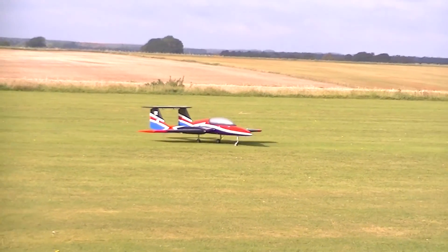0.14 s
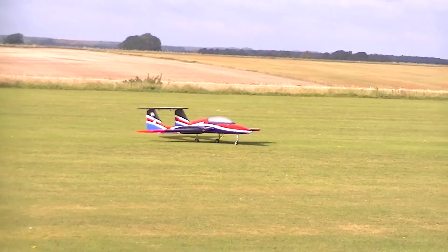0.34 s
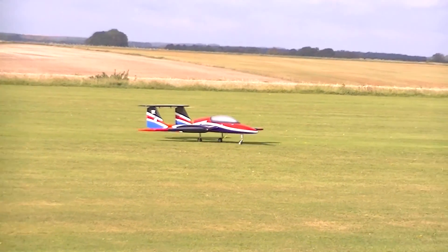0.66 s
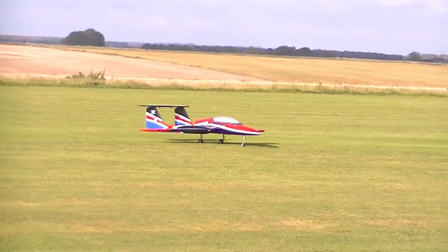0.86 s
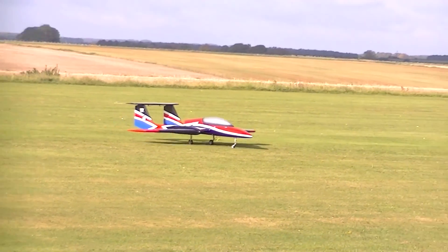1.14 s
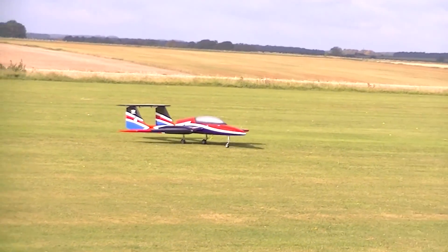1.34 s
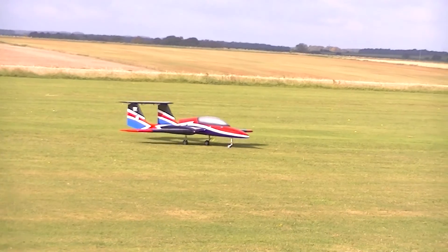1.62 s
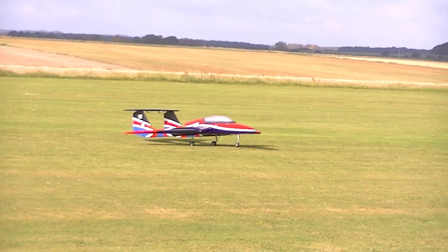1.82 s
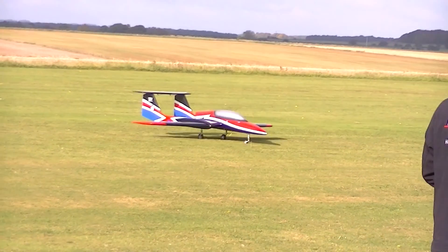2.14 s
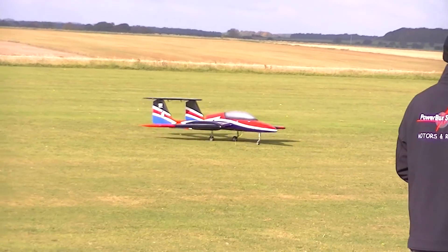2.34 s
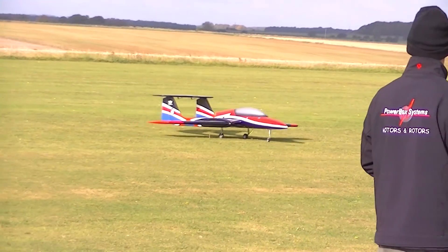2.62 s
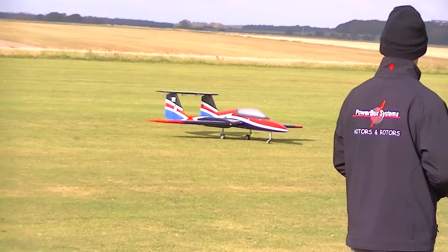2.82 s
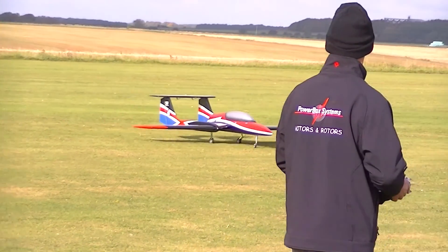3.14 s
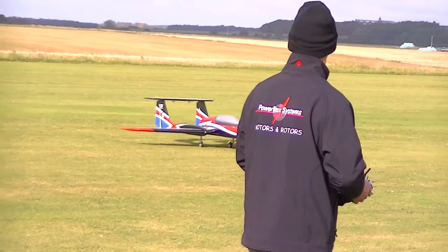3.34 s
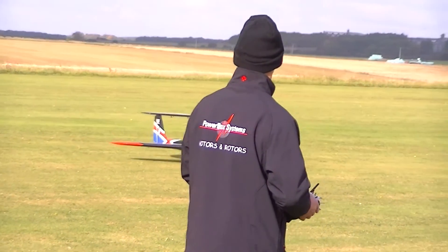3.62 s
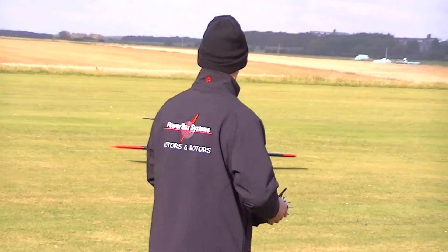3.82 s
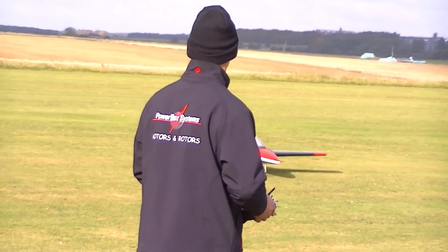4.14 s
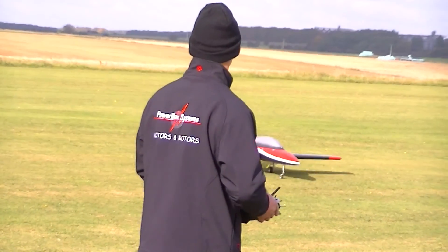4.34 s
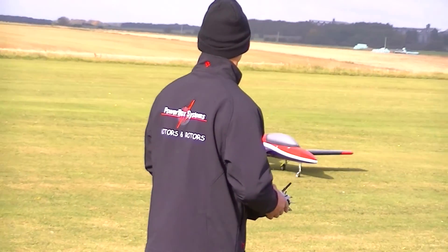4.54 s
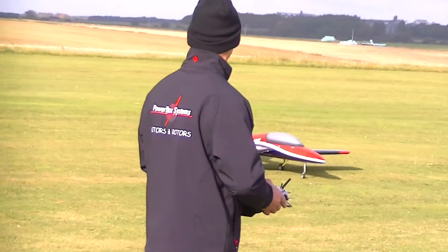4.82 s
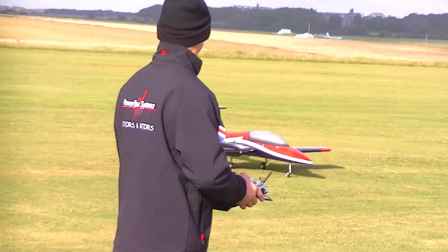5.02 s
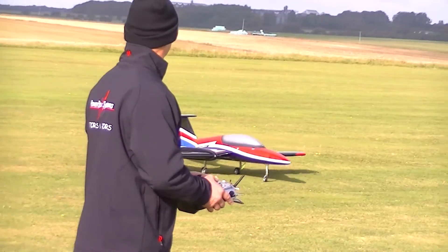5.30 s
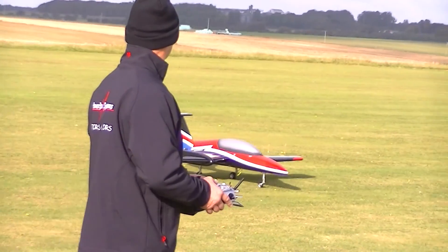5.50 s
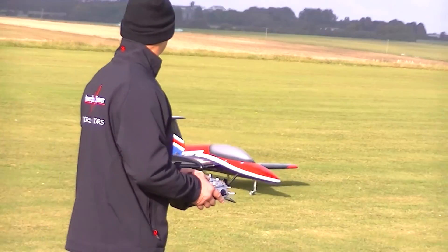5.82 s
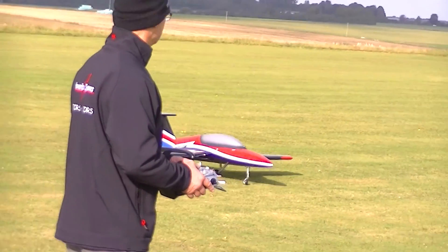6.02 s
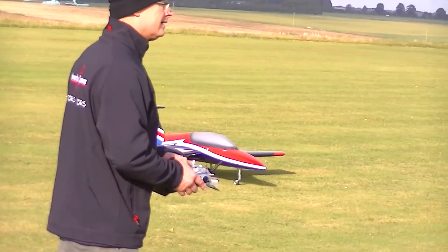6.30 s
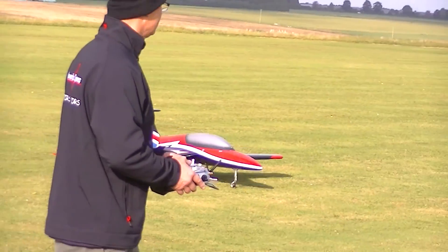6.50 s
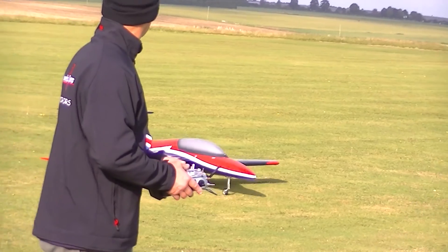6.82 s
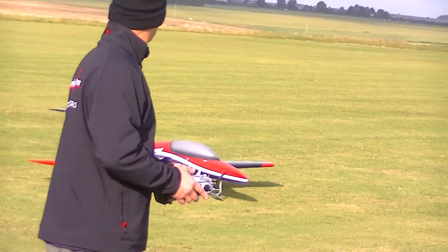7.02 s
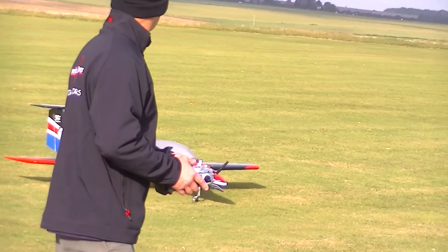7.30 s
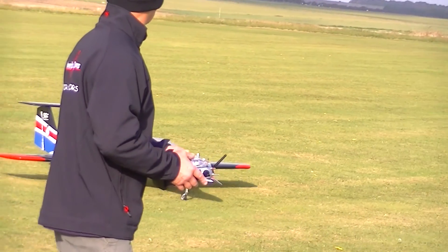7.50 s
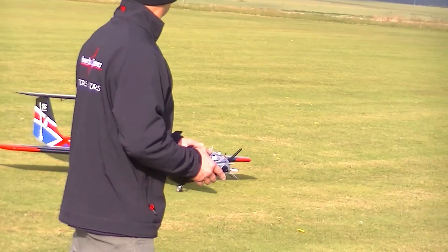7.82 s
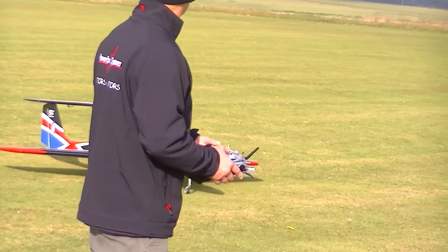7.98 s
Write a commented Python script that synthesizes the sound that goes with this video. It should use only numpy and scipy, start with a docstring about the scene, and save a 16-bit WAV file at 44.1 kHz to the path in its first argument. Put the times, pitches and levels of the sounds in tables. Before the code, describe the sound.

A small turbine rushes and hisses outdoors, heard fairly close and centred, with no echo. Brief low wind thumps come first while the whine drops quickly, then holds. It rises a little midway and falls again, slowing strongly. Near the end the intake faces the microphone: the shrill whine becomes strong and pure, dips to its lowest pitch, then climbs as the rush and roar swell.

```python
"""A model jet taxis over a grass field towards the microphone, side-on at first, its turbine spooling down.
Shaft-locked compressor tones sound over the roar and hiss of the jet, shaped noise; flaps of wind, low noise
in short swells, stir the microphone, most of them in the first second. The turbine slows, picks up a little,
then sinks towards idle; a strong gust comes near 6.2 s and the nose swings round: the whine at 16 times the
shaft rate comes forward, the air takes on a frontal colour. At the end the turbine spools up, the roar grows."""
import sys
import numpy as np
from scipy.fft import rfft, irfft, next_fast_len
from scipy.io import wavfile
from scipy.ndimage import map_coordinates

SR = 44100
rng = np.random.default_rng(int(sys.argv[2]) if len(sys.argv) > 2 else 0)


def store_pcm(level_fs):
    """Save levels as 16-bit WAV."""
    pcm = np.round(np.clip(level_fs, -1, 1) * 32767).astype(np.int16)
    wavfile.write(sys.argv[1], SR, np.atleast_2d(pcm).T)


N = 359415  # length [samples]

# air rushing through the ducts: (time [s], level [dB])
DUCT_RUSH = [(0, -35), (.25, -38.5), (1.3, -40), (2.07, -35.5), (2.3, -39.5), (2.94, -31.5), (3.3, -38),
             (3.78, -33.5), (3.98, -37), (4.41, -33.6), (4.79, -40.5), (5.0, -36), (6.2, -39.5),
             (6.65, -41.5), (7.11, -38.5), (7.44, -33.5), (7.9, -30.7)]
# hiss of the nozzle, swelling and fading on the breeze: (time [s], level [dB])
NOZZLE_HISS = [(0, -34.5), (.68, -33.5), (.87, -37.5), (1.55, -32.5), (1.67, -37.5), (1.78, -28.5),
               (2.3, -35.5), (2.45, -31), (2.82, -36), (2.93, -28), (3.15, -37.5), (3.78, -35.5),
               (3.93, -41.5), (4.58, -39.5), (4.84, -42), (4.98, -33.5), (5.24, -42.5), (5.55, -33.5),
               (5.72, -39.5), (6.4, -41.5), (6.9, -41.5), (7.25, -35.5), (7.68, -37.5), (8.15, -34.5)]
# how much the plane shows its nose and intakes to the microphone: (time [s], share [0-1])
NOSE_SHARE = [(0, 0.02), (3, 0.04), (4.2, 0.17), (5.2, 0.23), (6, 0.25), (6.6, 0.55), (7.3, 0.75),
              (8.15, 0.8)]


def amp(db):
    """Decibels to gain."""
    return 10 ** (np.asarray(db) / 20)


def unit(x):
    """Scale to rms 1."""
    return x / np.sqrt(np.mean(x ** 2) + 1e-20)


def curves(rows):
    """One value per sample for each column after the time."""
    s, *columns = np.transpose(rows)
    return [np.interp(np.arange(N) / SR, s, column) for column in columns]


def glide(rows):
    """A natural cubic spline through (s, value) rows: a heavy rotor changes speed smoothly."""
    s, value = np.transpose(rows)

    def basis(t):
        return np.c_[np.abs(t[:, None] - s) ** 3, np.ones(len(t)), t]

    straight_ends = np.c_[np.array([np.ones(len(s)), s]), np.zeros((2, 2))]
    weights = np.linalg.solve(np.r_[basis(s), straight_ends], np.r_[value, 0, 0])
    t = np.linspace(0, N / SR, 2000)
    return curves(np.c_[t, basis(t) @ weights])[0]


def wobble(rate):
    """A smooth random curve, rate knots a second."""
    knots = rng.standard_normal(int(N * rate / SR) + 4)
    return map_coordinates(knots, [np.arange(N) * rate / SR])


def swell(s, length):
    """A bell-shaped rise and fall around a moment; length [s] runs from the peak to 1/e."""
    return np.exp(-((np.arange(N) / SR - s) / length) ** 2)


def filtered(x, response):
    """x shaped by a gain that depends on frequency."""
    m = next_fast_len(N + SR // 2)  # half a second of room for ringing
    return irfft(rfft(x, m) * response(np.fft.rfftfreq(m, 1 / SR)), m)[..., :N]


def noise(colour):
    """Noise of rms 1 with a (Hz, dB) spectrum, silent outside it."""
    f, db = np.transpose(colour)

    def response(hz):
        return amp(np.interp(np.log(hz + 1), np.log(f), db, -120, -120))

    return unit(filtered(rng.standard_normal(N), response))


def bumps(rows, hz):
    """Gain of bell-shaped peaks and hollows at the given frequencies."""
    return amp(sum(db * np.exp(-((hz - centre) / width) ** 2) for centre, width, db in rows))


def skirt(phase, width_hz):
    """A band of noise that follows a tone: turbulence scatters its energy to both sides."""
    def response(hz):
        return (hz < 4 * width_hz) / (1 + (hz / width_hz) ** 2)

    sway = filtered(rng.standard_normal((2, N)), response)
    return unit(sway[0] * np.cos(phase) + sway[1] * np.sin(phase))


def nose_on():
    """Share of the nose view, 0 to 1: the plane's heading decides which sounds reach the microphone."""
    return np.clip(curves(NOSE_SHARE)[0], 0, 1)


def wind():
    """A light breeze, its gusts and a few sharp flaps stir the two microphone ports separately."""
    # sharp flaps: (time [s], level [dB], played 10 dB lower)
    flap_rows = [(0.432, -47), (0.509, -32), (0.531, -26), (0.568, -38), (0.588, -33.5), (0.687, -38),
                 (0.739, -31.5), (0.754, -39), (0.792, -37), (0.808, -37), (0.867, -37), (0.951, -41),
                 (2.96, -42), (2.984, -37), (6.215, -33)]
    # gusts: (time [s], peak level [dB], length from peak to 1/e [s])
    gust_rows = [(.65, -59, .2), (3.302, -59, .4), (4.284, -62, .14), (6.19, -54.5, 0.56)]
    # spectrum of the wind noise: (frequency [Hz], relative density [dB])
    wind_colour = [(20, -48), (60, -28), (120, -11), (200, -2), (300, 0), (450, -4), (700, -12),
                   (1500, -28), (5000, -70)]
    calm_db, flap_s = -81, 0.014  # the breeze between gusts; flap length from peak to 1/e
    flaps = sum(amp(db - 10) * swell(s, flap_s) for s, db in flap_rows)
    breeze = amp(calm_db) + sum(amp(db) * swell(s, length) for s, db, length in gust_rows)
    eddies = amp(2.2 * wobble(25))
    return (breeze * eddies + flaps) * np.array([noise(wind_colour), noise(wind_colour)])


def coloured(air):
    """The airframe's resonances and hollows colour the air; a frontal set joins as the nose swings round."""
    # fixed resonances and hollows: (centre [Hz], width [Hz], gain [dB])
    body_rows = [(380, 50, -2.5), (520, 110, 2.5), (830, 110, -1.5), (1410, 60, -2.5), (1640, 45, 3),
                 (1830, 90, 1.5), (2100, 70, -1), (2720, 80, -3.5), (3350, 150, -4.5), (3610, 100, 1),
                 (3920, 60, -4), (4380, 70, -2), (4820, 70, -4.5), (5490, 90, 2), (5790, 70, -2.5),
                 (6000, 80, 2), (6220, 70, -2), (6980, 80, -3.5), (7460, 130, -5.5), (7940, 50, -2.5),
                 (8150, 100, 2.5), (8580, 170, -2), (9700, 350, 1.5)]
    # extra colour of the air heard from the front: (centre [Hz], width [Hz], gain [dB])
    front_rows = [(600, 240, 5), (945, 210, -2), (1332, 47, 6.5), (1750, 430, 3), (2160, 310, -4),
                  (3294, 140, -21), (4190, 190, 3), (4630, 49, 1), (5050, 110, 2.5), (5320, 64, -10),
                  (5480, 110, 5.5), (5610, 130, -8), (6150, 580, -8), (7200, 840, -11.5)]
    facing = nose_on()
    aside = filtered(air, lambda hz: bumps(body_rows, hz))
    ahead = filtered(aside, lambda hz: bumps(front_rows, hz))
    return (1 - facing) * aside + facing * ahead


def jet():
    """Large eddies roar, small ones hiss; the breeze makes the hiss waver more than the rush."""
    # roar of the exhaust: (time [s], level [dB])
    roar_rows = [(0, -42.5), (.5, -43.5), (.92, -47), (1.9, -45), (2.17, -43), (2.5, -45), (3.29, -42.5),
                 (4.1, -39.5), (4.42, -36.5), (5.3, -39.5), (5.75, -38.5), (6.25, -45), (6.7, -47),
                 (7.02, -44.8), (7.55, -37), (8.15, -33)]
    # the finest hiss, mostly above 10 kHz: (time [s], level [dB])
    fine_rows = [(0, -36.5), (.68, -40), (1.05, -44.5), (1.56, -37), (1.67, -50), (1.79, -37), (2.3, -45),
                 (2.42, -37.5), (2.82, -46), (2.92, -40), (3.08, -49), (4.35, -48.5), (4.6, -38),
                 (4.83, -50), (4.99, -41), (5.42, -46), (5.6, -39.5), (7.55, -41.5), (7.72, -48),
                 (8.15, -47)]
    # the whole rush of air dips briefly: (time [s], change [dB], length from peak to 1/e [s])
    lull_rows = [(6.554, -5, 0.042), (7.706, -4, 0.064)]
    # spectra from deep to fine: (frequency [Hz], relative density [dB])
    low_roar_colour = [(20, -70), (60, -31), (110, -25), (170, -10), (260, -3.5), (500, -1), (800, 0.5),
                       (1200, 1.5), (1600, -1.5), (2600, -55)]
    upper_roar_colour = [(700, -31), (1200, -18), (1550, -1.5), (2400, 1.5), (3100, 0), (3700, -2.5),
                         (5000, -33)]
    rush_colour = [(2300, -21), (3200, -7), (3700, -2.5), (5400, 1.5), (6400, 2), (7300, -4), (9500, -15)]
    hiss_colour = [(4500, -15), (6300, -1.5), (7200, -1.5), (9000, 1.5), (10000, 1.5), (10900, -6.5),
                   (13000, -33)]
    fine_colour = [(8500, -40), (10200, -7), (11000, 0), (12000, -2), (12600, -6), (13200, -12),
                   (16000, -14)]
    # the deep roar: its level when the upper roar is usual, and its share of the upper roar's swing
    low_roar_db, usual_roar_db, low_roar_share = -47.5, -43, 0.6
    low_roar_front_db = 0.5  # it carries a little better from the front

    upper_db, = curves(roar_rows)
    low_db = low_roar_db + low_roar_share * (upper_db - usual_roar_db) + low_roar_front_db * nose_on()
    rush_db, = curves(DUCT_RUSH)
    hiss_db, = curves(NOZZLE_HISS)
    fine_db = curves(fine_rows)[0] + 1.3 * wobble(15)
    breeze = wobble(22)
    low_roar = amp(low_db) * noise(low_roar_colour)
    upper_roar = amp(upper_db + 0.46 * wobble(6.5)) * noise(upper_roar_colour)
    rush = amp(rush_db + 0.35 * breeze) * noise(rush_colour)
    hiss = amp(hiss_db + 1.3 * breeze) * noise(hiss_colour)
    fine_hiss = amp(fine_db + 1.0 * breeze) * noise(fine_colour)
    lull_db = sum(db * swell(s, length) for s, db, length in lull_rows)
    return amp(lull_db) * coloured(low_roar + upper_roar + rush + hiss + fine_hiss)


def ground(x):
    """At moments the bounce off the grass cancels part of the middle range."""
    # moments of cancellation: (time [s], depth [0-1], length from peak to 1/e [s])
    bounce_rows = [(3.286, 0.52, 0.18), (5.317, 0.5, 0.26)]
    centre_hz, width_hz = 3730, 1100
    depth = np.clip(sum(deepest * swell(s, length) for s, deepest, length in bounce_rows), 0, 1)
    return x - depth * filtered(x, lambda hz: np.exp(-((hz - centre_hz) / width_hz) ** 2))


def compressor():
    """Blade tones locked to the shaft; moving air makes them flutter and scatters part into noise."""
    # turbine speed: (time [s], shaft rate [turns/s])
    shaft_rows = [(0.0, 1176.6), (0.31, 1178.7), (0.6, 1163.1), (1.12, 1034.0), (1.64, 972.8),
                  (2.06, 959.1), (3.34, 954.0), (3.7, 963.3), (4.2, 1020.5), (4.74, 1030.5), (5.08, 967.8),
                  (5.54, 918.8), (5.76, 903.0), (6.14, 824.5), (6.39, 742.7), (7.19, 637.9), (7.74, 705.4),
                  (8.15, 789.8)]
    # tone of the eight main blades: (time [s], level [dB])
    blade_rows = [(0, -35.5), (.6, -27.5), (.73, -36.5), (1.1, -36), (1.4, -40), (2.7, -42.5), (2.98, -37),
                  (3.56, -52), (3.74, -29.5), (4.0, -47), (4.5, -38.5), (4.78, -44), (5.06, -36.5),
                  (5.28, -43), (6.5, -46), (6.67, -42), (6.9, -59), (7.41, -51), (7.85, -58)]
    # whine of all sixteen blades, beamed forward from the intake: (time [s], level before the nulls [dB])
    whine_rows = [(1.6, -46), (1.95, -32), (2.06, -45), (2.8, -48), (2.97, -28), (3.06, -36), (3.25, -36),
                  (3.42, -45), (3.85, -44), (5.05, -33.5), (5.57, -27), (5.8, -29.5), (6.2, -29),
                  (6.28, -17.8), (6.9, -16.5), (7.15, -18.5), (7.7, -17), (7.99, -31)]
    # weak shaft tones, at full strength from the side: (multiple of shaft rate, level re nozzle hiss [dB])
    weak_rows = [(2, -25), (11, -19), (14, -24), (15, -22)]
    # pitches at which reflections cancel the whine: (centre [Hz], width [Hz], gain [dB])
    null_rows = [(10470, 40, -14), (10795, 28, -12), (11420, 45, -12), (11830, 50, -6), (12270, 50, -5),
                 (13830, 30, -8), (14340, 90, -6), (14600, 30, -7), (14810, 35, -10), (15150, 45, -7),
                 (15440, 35, -7)]
    main_blades, all_blades = 8, 16
    whine_flicker_db = 2.3  # wavering of the whine when heard from the side

    speed = glide(shaft_rows) * (1 + .00018 * wobble(14))
    turn = 2 * np.pi * np.cumsum(speed) / SR  # shaft angle [rad]

    def tone(order):
        return np.sqrt(2) * np.sin(order * turn)  # rms 1

    blade_db, = curves(blade_rows)
    rush_db, = curves(DUCT_RUSH)
    hiss_db, = curves(NOZZLE_HISS)
    facing = nose_on()

    # the lower tone is partly scattered by the hot, turbulent air around the plane
    core = amp(-7.0) * tone(main_blades)
    blurred = amp(-3.5) * skirt(main_blades * turn, width_hz=5.7)
    blurred = blurred + amp(-5.0) * skirt(main_blades * turn, width_hz=110)
    blade = amp(blade_db + 1.07 * wobble(45) + 1.5 * wobble(11)) * (core + blurred)

    whine_db = curves(whine_rows)[0] + whine_flicker_db * (1 - facing) ** 2 * wobble(17)
    flutter = amp(.6 * wobble(30) + .4 * wobble(90))
    whine = amp(whine_db) * tone(all_blades) * bumps(null_rows, all_blades * speed) * flutter
    # the haze rises half as fast in dB: the whine is purest when its beam points at the microphone
    haze = amp(whine_db / 2 - 32) * skirt(all_blades * turn, width_hz=90)

    # weak tones leave sideways with the hiss and fade towards the top
    weak = sum(amp(hiss_db + db + 1.9 * wobble(9.7)) * tone(round(order)) for order, db in weak_rows)
    weak = (1 - facing) * filtered(weak, lambda hz: 1 / (1 + (hz / 11500) ** 12))

    # slight imbalance hums once per turn
    hum = facing * amp(-57 + 2.8 * wobble(8)) * tone(1)

    # the blades also chop the turbulent intake air into a hump of noise, sharper from the front
    chopped = amp(rush_db - 8.5 + 6.3 * facing) * skirt(main_blades * turn, width_hz=1160)
    chopped = chopped + facing * amp(rush_db - 8) * skirt(main_blades * turn, width_hz=340)
    return blade + weak + hum + coloured(chopped), whine + haze


def scene():
    """The plane is straight ahead of the microphone; only its beamed whine leans a little to the left."""
    tones, whine = compressor()
    left_right_db = [[.25], [-.25]]
    return wind() + ground(jet()) + tones + whine * amp(left_right_db)


def record(dry):
    """The recorder keeps nothing above its band limit."""
    top_hz = 15800
    return filtered(dry, lambda hz: hz < top_hz)


dry = scene()
out = record(dry)
store_pcm(out)
```